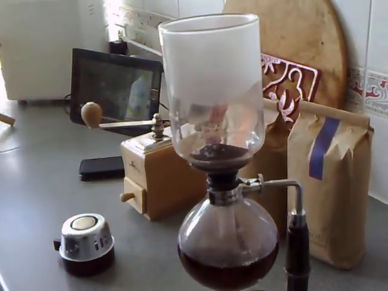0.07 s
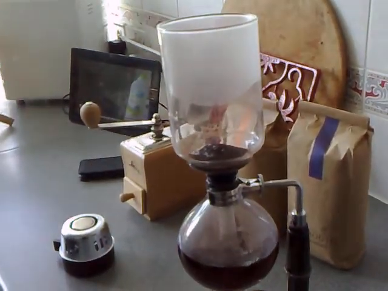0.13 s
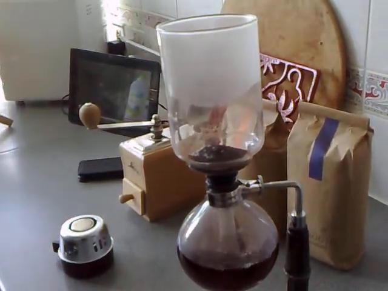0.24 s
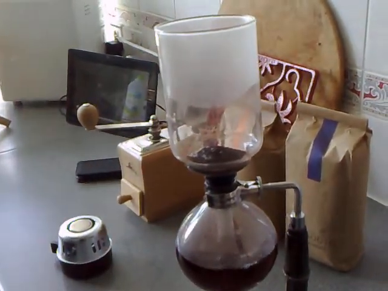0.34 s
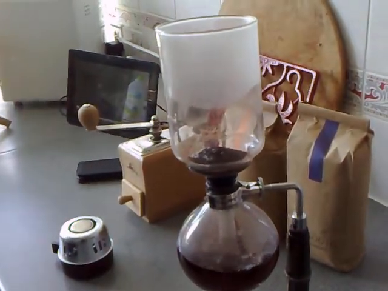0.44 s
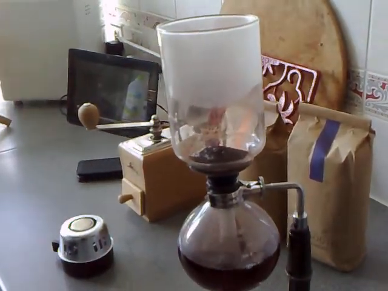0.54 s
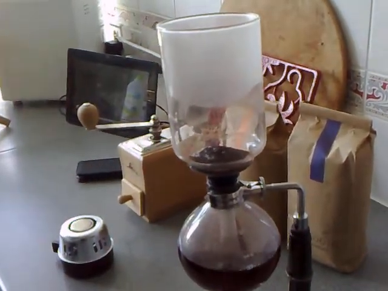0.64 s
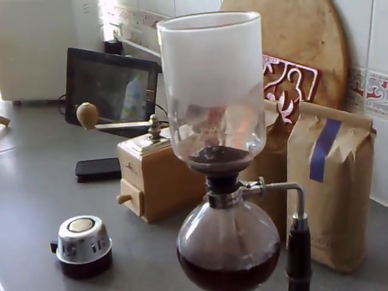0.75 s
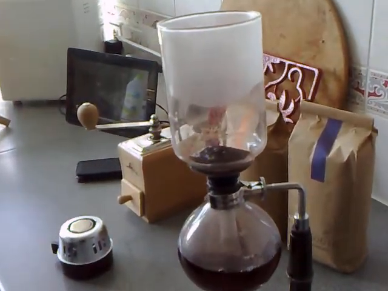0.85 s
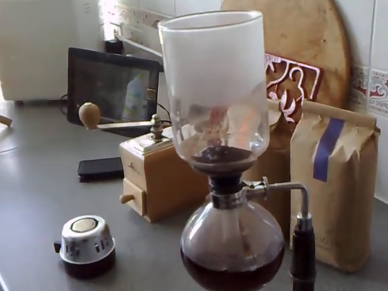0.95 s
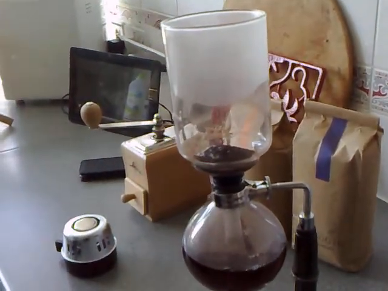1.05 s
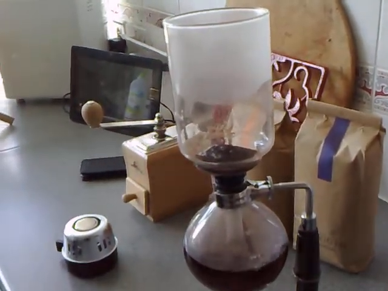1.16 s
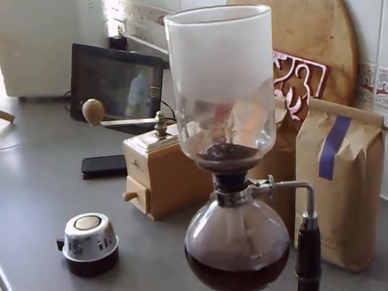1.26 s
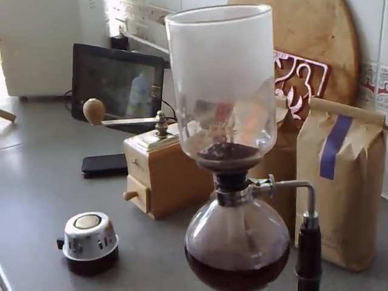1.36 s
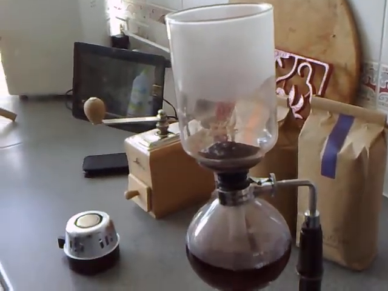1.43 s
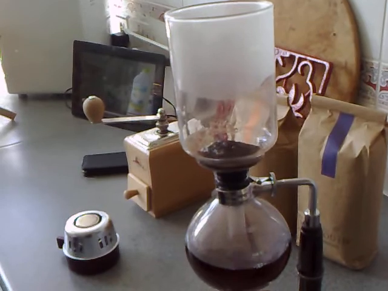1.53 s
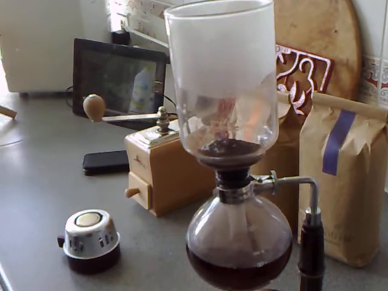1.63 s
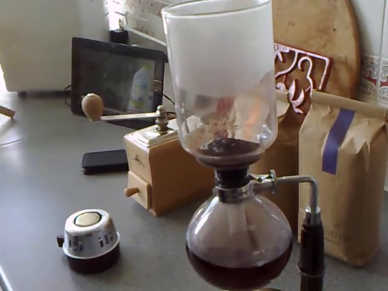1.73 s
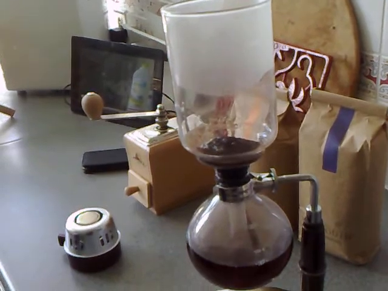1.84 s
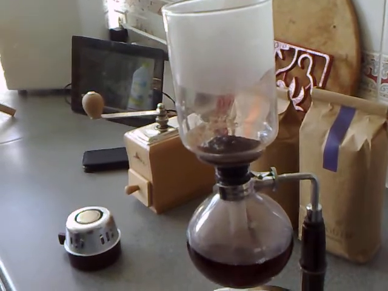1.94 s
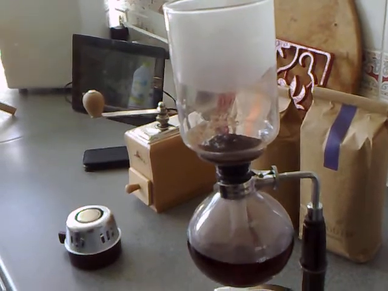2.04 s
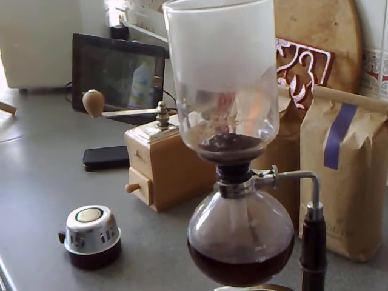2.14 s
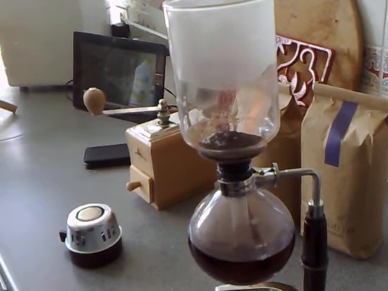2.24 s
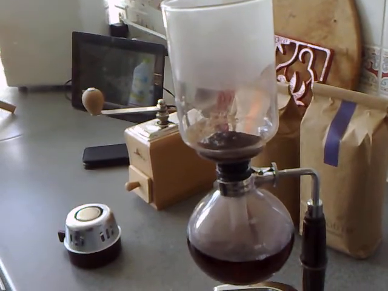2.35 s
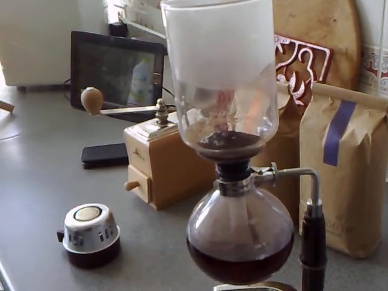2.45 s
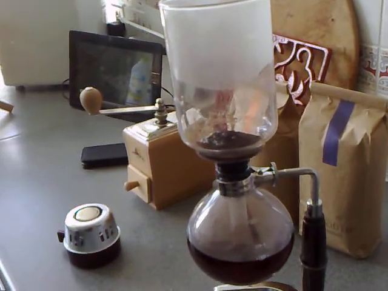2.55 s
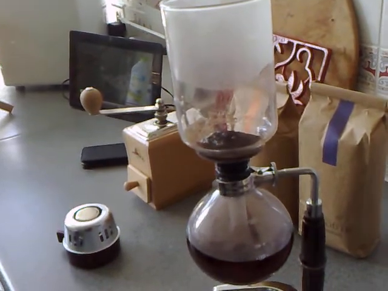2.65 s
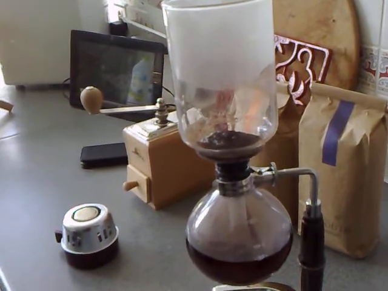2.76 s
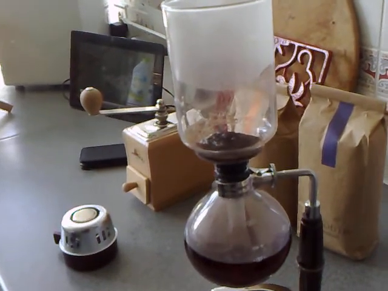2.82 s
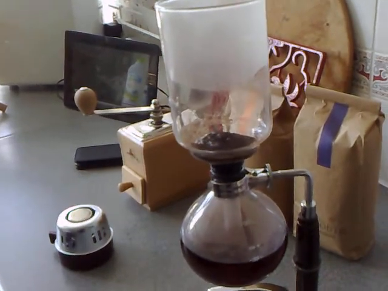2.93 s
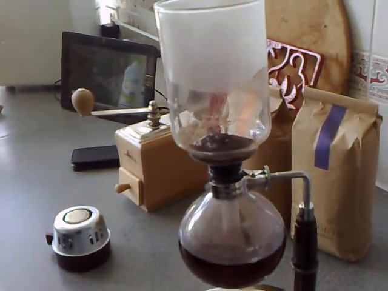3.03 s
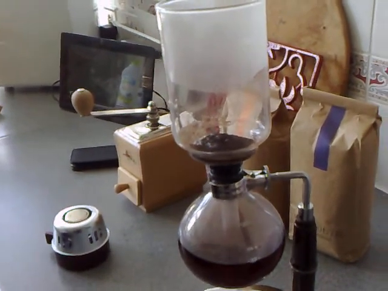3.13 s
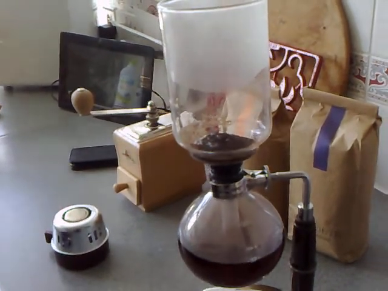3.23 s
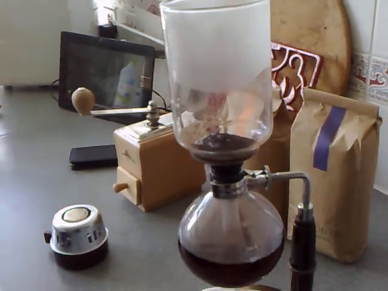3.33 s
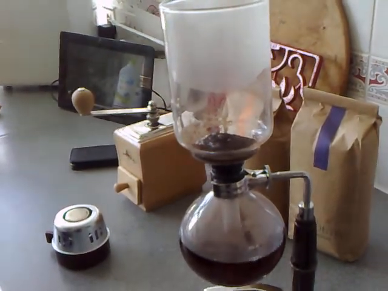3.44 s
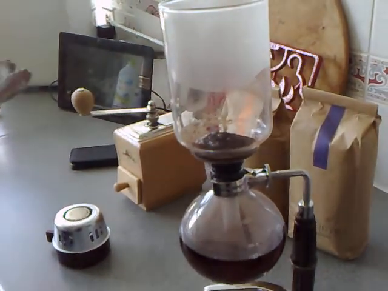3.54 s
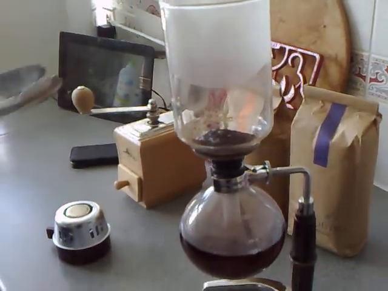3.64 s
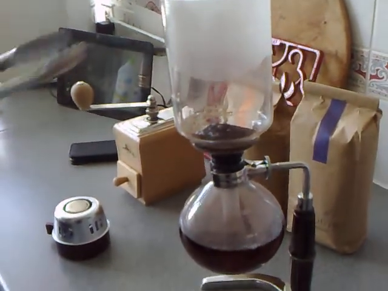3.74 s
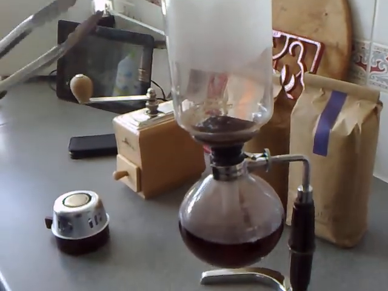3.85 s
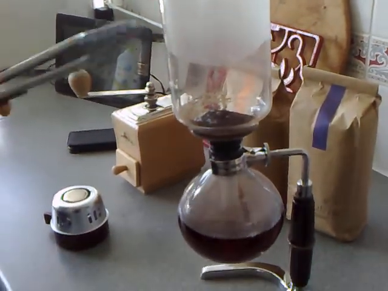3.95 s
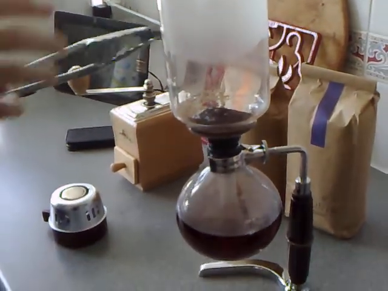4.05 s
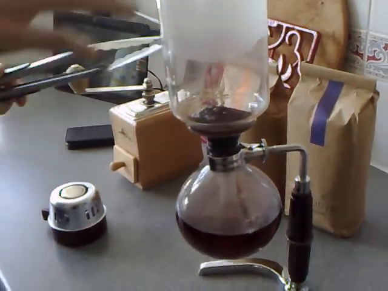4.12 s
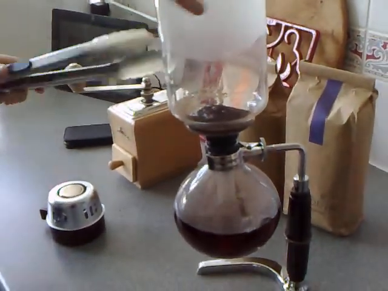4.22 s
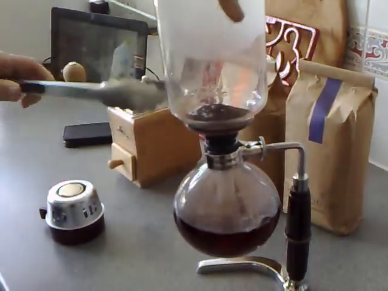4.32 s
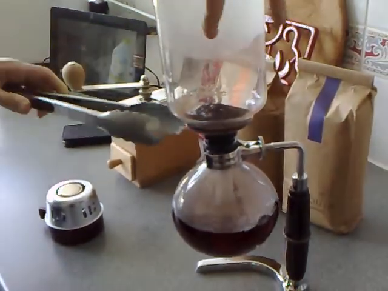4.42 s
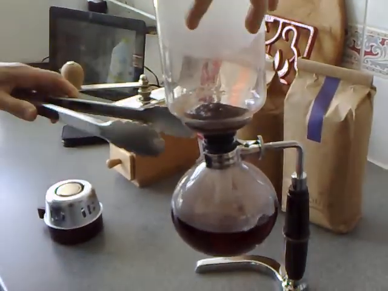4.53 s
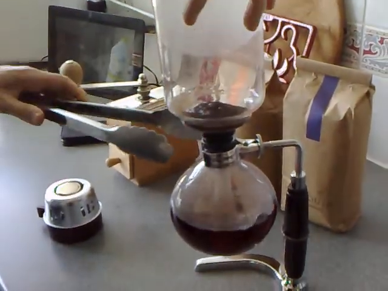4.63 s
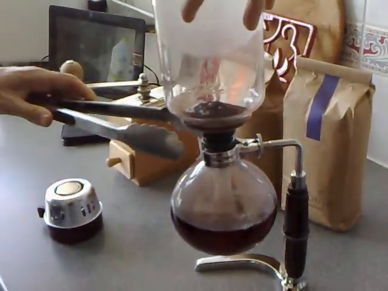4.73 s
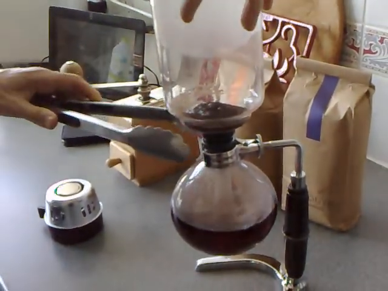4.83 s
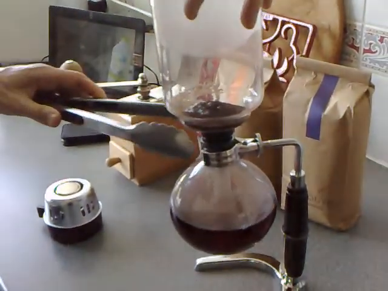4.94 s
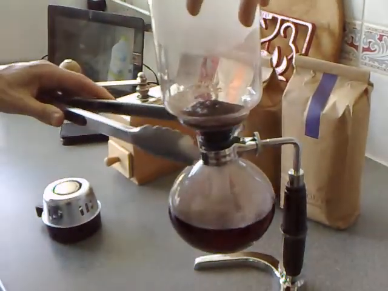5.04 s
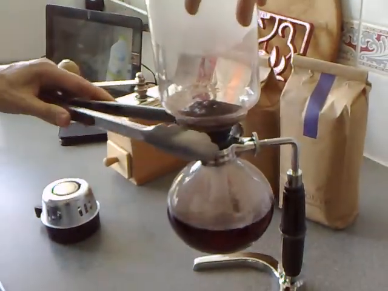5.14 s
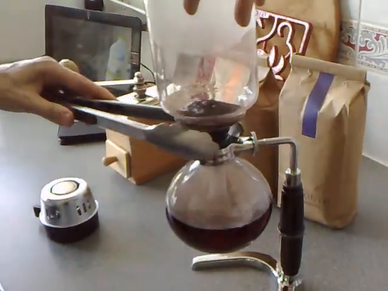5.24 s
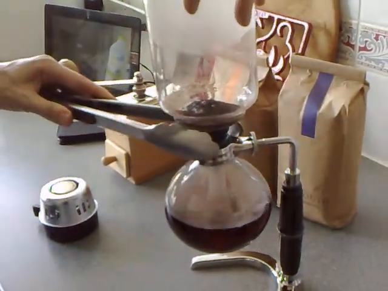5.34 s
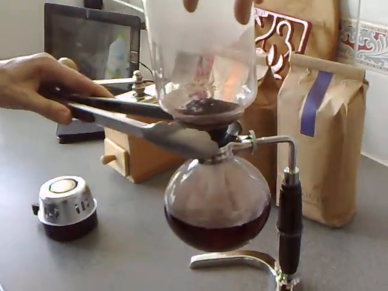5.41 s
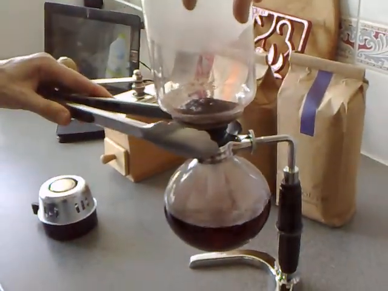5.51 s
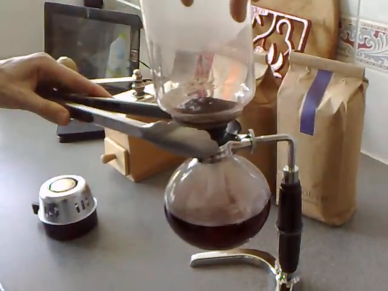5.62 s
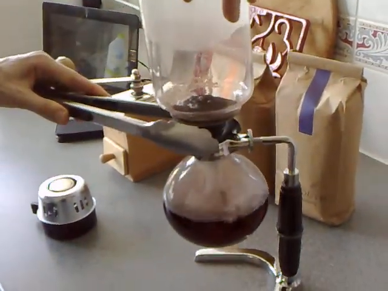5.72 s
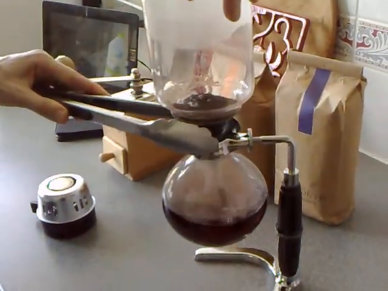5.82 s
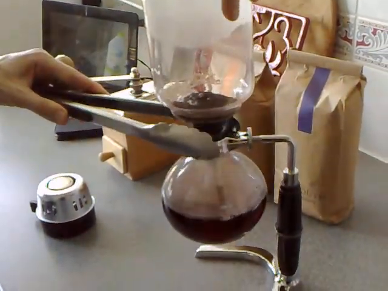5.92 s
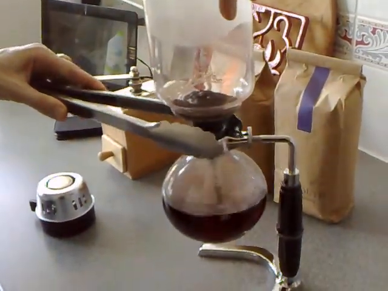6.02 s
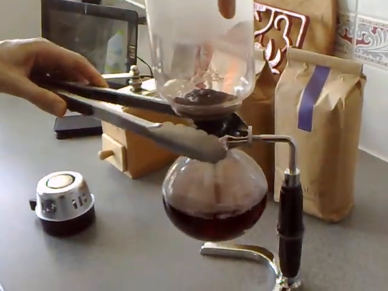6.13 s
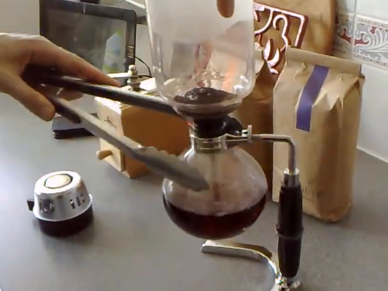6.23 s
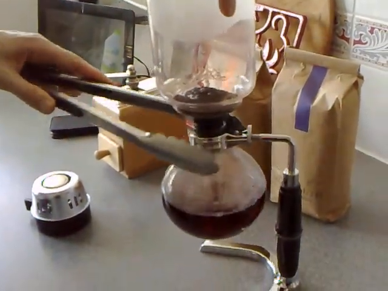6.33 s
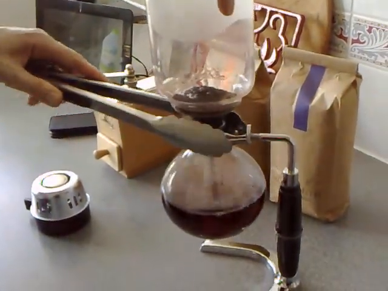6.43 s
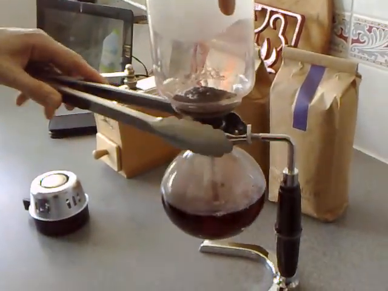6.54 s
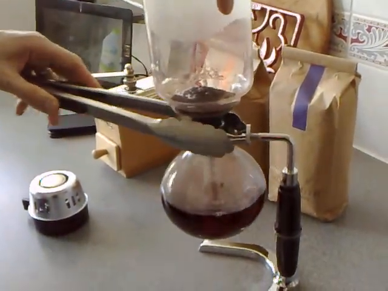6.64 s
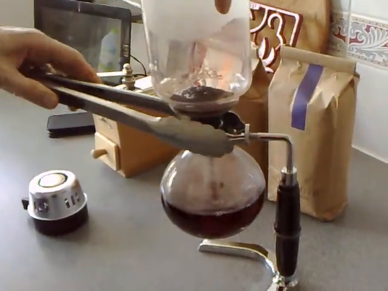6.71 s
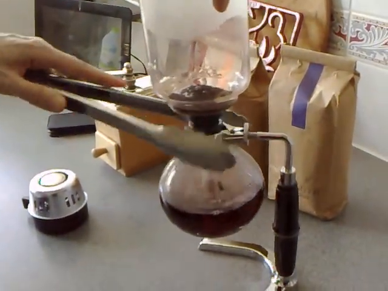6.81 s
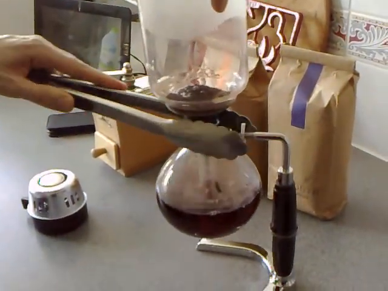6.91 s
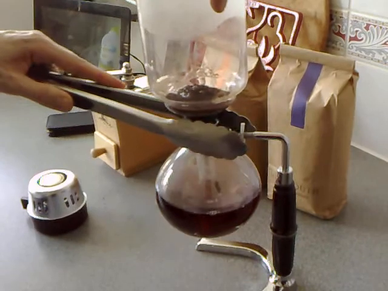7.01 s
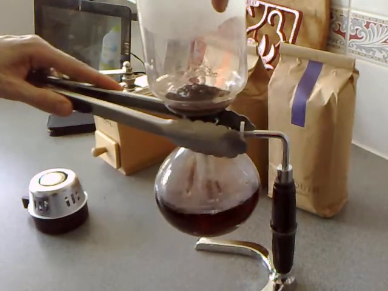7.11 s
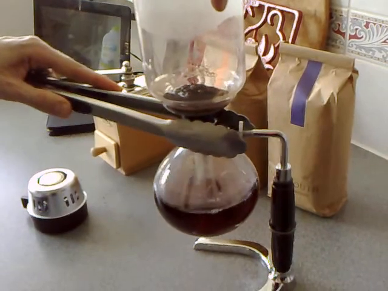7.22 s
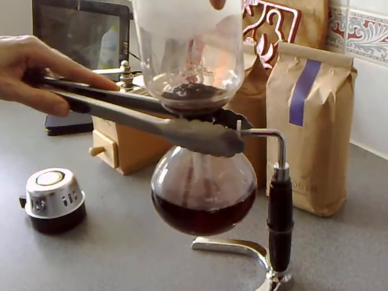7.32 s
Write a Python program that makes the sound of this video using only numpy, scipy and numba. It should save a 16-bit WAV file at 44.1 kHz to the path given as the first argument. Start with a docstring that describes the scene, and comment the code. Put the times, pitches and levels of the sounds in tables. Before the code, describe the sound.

A steady, soft room noise with faint hum and hiss runs throughout in a small, hard-surfaced kitchen. Tiny metal touches come at 0.1 and 0.2 seconds, then muffled utensil rattles from 0.9 to 1.4. At 1.6 steel tongs begin sliding off a rack in grainy, stick-slip pulls, swelling into a loud ringing screech with jolts around 1.9 to 2.1, then stopping suddenly. Metallic clicks follow at 2.6, a faint low thud at 2.7, a sharp double snap at 2.95 and another barely audible thud at 3.1. Faint ticks and a skin rustle pass between 3.5 and 3.9, then near quiet. At 5.3 bright, dry steel-on-glass clinks burst out with hollow knocks; a rubbery chafe comes at 5.9. More irregular clinks and knocks follow from 6.05 to 6.75, and a dense, hard cluster at 6.95 to 7.1. A faint clink ends it at 7.36. Background level dips after loud hits.

```python
"""Over a steady room noise with a faint hum and hiss, utensils are nudged on their rack in a small kitchen.
Steel tongs are pulled off the rack with a stick-slip scrape and a few jolts, snapped open between two faint
low thuds and slid through the hand. They clink on the neck and clamp of a glass vacuum coffee maker (overtone
bursts over damped modes) while its hand-rocked upper chamber knocks and chafes in its seat; a last faint clink
follows. Kitchen reflections surround the handling, and a gain control ducks after each loud sound."""
import sys
import numpy as np
from scipy import signal
from scipy.fft import rfft, irfft
from scipy.io import wavfile
from numba import njit

SR = 44100
rng = np.random.default_rng(int(sys.argv[2]) if len(sys.argv) > 2 else 0)


def wrap_up_sound(samples):
    """Save the sound to the file named by the first command line argument, as 16-bit audio."""
    columns = np.atleast_2d(samples).T
    # keep every value between -1 and 1, then stretch to whole-number steps
    tamed = np.clip(columns, -1, 1)
    steps = np.round(tamed * 32767).astype(np.int16)
    wavfile.write(sys.argv[1], SR, steps)


N = 325017
TIME = np.arange(N) / SR
RING = TIME[:SR // 2]  # time axis of one blow, half a second

# Room noise. Each row: frequency in Hz, level in dB.
ROOM_TONE = [(15, -38.5), (25, -2.5), (92, -1.5), (310, -2), (700, -9.5), (2050, -16.5), (5570, -26.5),
             (16000, -24)]
# Whirring bands in the room noise. Each row: centre in Hz, width at half amplitude in Hz, level in dB.
WHIR_BANDS = [(100, 15, -63.5), (245.4, 7, -63.5), (297.2, 8, -61), (2083, 180, -61)]
# Decay of the kitchen's reflections. Each row: frequency in Hz, t60 in seconds.
ROOM_T60 = [(200, 0.39), (2500, 0.25), (6000, 0.18), (14000, 0.12)]
# Tone of the reflections. Each row: frequency in Hz, level in dB.
ROOM_COLOUR = [(600, 3), (5500, 4), (10000, 6)]

# Utensils nudged on their rack and the worktop, and two faint low thuds, perhaps footsteps or a drawer.
# Each row: start in seconds, level in dB, t60 of the rattle's envelope in seconds, strongest ring in Hz.
NUDGES = [(.23, -45, 0.09, 300), (.901, -38.5, 0.15, 575), (.932, -39.5, 0.11, 2080),
          (1.112, -36, 0.1, 1500), (1.279, -35, 0.24, 1430), (1.312, -34, 0.26, 1500),
          (1.328, -37, 0.052, 524), (1.363, -36, .08, 1480), (2.678, -51, 0.08, 403),
          (3.097, -70, 0.21, 480)]
# Pulls that slide the tongs off the rack. Each row: start in seconds, swell in seconds, t60 of the easing force
# in seconds, friction in dB, rack ring in dB, mounting rumble in dB, screech in Hz, screech in dB.
PULLS = [(1.587, 0.067, 0.36, -32.5, -48, -45.5, 2000, -40),
         (1.732, 0.018, 0.12, -34, -39.5, -39.5, 2530, -38.5),
         (1.765, 0.026, 0.18, -30.5, -25, -46, 1280, -22),
         (1.812, 0.031, 0.49, -33.5, -31, -51.5, 1880, -34),
         (1.93, 0.011, 0.6, -15, -11, -41.5, 1400, -11.5),
         (2.013, 0.029, 0.13, -18, -10.5, -25, 2390, -6.5)]
# The tongs jolt against the rack as they slide. Each row: start in seconds, level in dB.
BUMPS = [(1.834, -25), (1.958, -14.5), (1.981, -19.5), (2.003, -16.5)]
# The tongs' arms, lock and spring, and a last faint clink.
# Each row: start in seconds, level in dB, t60 of the rattle's envelope in seconds, strongest ring in Hz.
SNAPS = [(.14, -41.5, 0.078, 1810), (2.588, -29.5, 0.14, 1570), (2.612, -21, 0.11, 2850),
         (2.949, -13.5, 0.055, 2280), (2.967, -15, 0.068, 1500), (3.523, -47, .012, 1180),
         (3.771, -41.5, .052, 5140), (3.794, -36.5, 0.026, 5040), (3.902, -43, 0.13, 4500),
         (7.361, -35.5, 0.2, 2560)]
# The tongs slide lightly through the hand. Each row: middle in seconds, level in dB, half length in seconds.
RUSTLES = [(3.64, -60.5, 0.091)]
# The rubber seal chafes as the chamber is rocked. Each row: middle in seconds, level in dB, half length in seconds.
CHAFES = [(5.883, -34, 0.039), (6.251, -37, 0.014), (6.283, -49.5, 0.45)]
# The chamber knocks in its seat.
# Each row: start in seconds, level in dB, t60 of the wobble's envelope in seconds, strongest ring in Hz.
KNOCKS = [(5.299, -20.5, 0.21, 902), (5.303, -23.5, 0.18, 240), (5.358, -22, 0.12, 477),
          (6.078, -29, 0.081, 780), (6.323, -23.5, 0.12, 478), (6.331, -22.5, 0.046, 486),
          (6.353, -24.5, 0.23, 434), (6.606, -22.5, 0.11, 294), (6.937, -36, 0.084, 225),
          (7.009, -27.5, 0.13, 217), (7.082, -16.5, 0.037, 866), (7.12, -27.5, 0.089, 720)]
# Tongs on the glass neck and clamp. Each row: start in seconds, level in dB, high ring in dB,
# t60 of the contact chatter's envelope in seconds, strongest ring in Hz.
CLINKS = [(5.2939, -16, -8.5, 0.053, 6100), (5.321, -2, -15.5, 0.04, 4620), (5.3563, -4, -5.5, 0.029, 2570),
          (6.053, -35.5, -22.5, 0.078, 2800), (6.0761, -13.5, -1, 0.022, 1610), (6.32, -29, -4, 0.1, 1700),
          (6.3491, -5.5, 3, 0.029, 2700), (6.474, -25, -1, 0.0047, 2630), (6.5614, -26, 0, 0.043, 2150),
          (6.5901, -2.5, -1, 0.018, 5100), (6.605, -9.5, -1.5, 0.0051, 4940),
          (6.7531, -12.5, -0.5, 0.027, 9500), (6.965, -11.5, 11.5, 0.02, 1640), (7.0135, -9, 0, 0.04, 1980),
          (7.078, -4, 1, 0.038, 2390), (7.083, 1, -3, 0.02, 1580), (7.088, -6, -1, 0.03, 7540)]

# Ringing modes of each object. Each row: frequency in Hz, level in dB, t60 in seconds.
UTENSIL_MODES = [(513, -6.5, 0.074), (1500, 3, 0.025)]
RACK_MODES = [(1163, -10, .08), (1400, 0, .07), (1443, 0, .09), (1507, 2, .09), (1637, -11, .09),
              (1760, -8, .09), (1986, -5, .1), (2175, -11, .08), (2579, -11, .14)]
BLADE_MODES = [(2326, -3, .05), (5150, -6, 0.06), (7307, -11, .07), (8370, -9, .05), (9090, -6, .05),
               (9700, -2, .06), (10370, -7, .07), (11230, -7, .06), (12660, -7, .04), (14770, -8, .06)]
SPRING_MODES = [(1474, -6, .08), (2350, 0, 0.038), (2716, -6, 0.068), (3820, 1, 0.097), (5136, -2, 0.065),
                (5720, -2.5, 0.06), (6220, 3, 0.05)]
CHAMBER_MODES = [(199, -9.5, 0.089), (312, -1.5, .058), (486, -5, 0.045), (708, 0.5, 0.036),
                 (854, -7.5, 0.048), (1113, -10, .069)]
CLAMP_MODES = [(4750, -3, 0.069), (6100, -1.5, 0.044), (8550, -6.5, 0.061)]
TONG_MODES = [(1800, 1, 0.024), (2397, 1.5, 0.015), (2560, 8.5, 0.018), (4550, -4.5, 0.03),
              (5315, 2, 0.042), (9670, 8.5, 0.017), (11050, -2.5, 0.022)]

# Dense overtones of each object or rub. Each row: frequency in Hz, level in dB.
UTENSIL_COLOUR = [(100, -29), (350, -5.5), (550, 6), (800, -4), (1500, -1.5), (2600, -5), (4000, -17),
                  (12000, -36)]
BLADE_COLOUR = [(100, -42.5), (300, -8.5), (750, -11), (1150, 3), (2550, -4), (3500, -11), (5300, -4.5),
                (6300, -12), (9800, -11.5), (16000, -20.5)]
RUMBLE_COLOUR = [(50, -40.5), (90, 4), (140, -5), (220, -17), (410, 0.5), (660, -16.5), (2000, -38)]
SPRING_COLOUR = [(40, -16), (200, -21.5), (800, -17.5), (1300, -11), (2300, -1.5), (2850, -6),
                 (3300, -10.5), (5900, -3.5), (6700, -13), (11000, -18.5), (16000, -26)]
RUSTLE_COLOUR = [(1000, -5), (5200, -1), (8000, -15)]
CHAMBER_COLOUR = [(80, -12.5), (210, -2.5), (370, 0.5), (490, 5), (900, -2), (2600, -11), (4000, -27.5),
                  (12000, -63)]
TONG_COLOUR = [(100, -52), (900, -5.5), (1650, -2.5), (2450, 4), (3500, -9), (5100, -1.5), (7200, -6.5),
               (9700, -9), (12000, -16), (16000, -20.5)]
# How the chamber answers at the neck, where the seal rubs. Each row: frequency in Hz, level in dB.
NECK_COLOUR = [(180, 0), (290, 7), (530, -8.5), (850, 1.5), (2400, -8)]

# How force and rattle tilt the spectrum of a blow; a negative loss brightens. Each row: level of a fully hard
# contact in dB, its tilt in dB per octave, tilt lost per dB below that level, tilt lost per second of rattle.
NUDGE_HARDNESS = (-31, 0.75, 0.6931, -2)
SNAP_HARDNESS = (-33, 3, 1.0755, 21.5)
KNOCK_HARDNESS = (-13.5, 0.5, 0.1871, -1.5)


def undb(db):
    """Decibels to gain."""
    return 10 ** (np.asarray(db) / 20)


def unit(x):
    """Scale to rms 1."""
    return x / np.sqrt(np.mean(x ** 2))


def along(points, hz):
    """Read (Hz, value) points on a log-frequency axis."""
    f, value = np.transpose(points)
    return np.interp(np.log(hz + 1e-9), np.log(f), value)


def bins(size):
    """Frequencies of a spectrum of this many samples, kept at 1 Hz or above."""
    return np.maximum(np.fft.rfftfreq(size, 1 / SR), 1)


def colour(x, points):
    """Shape a signal with a (Hz, dB) spectrum."""
    return irfft(rfft(x) * undb(along(points, bins(len(x)))), len(x))


def equalise(x, db):
    """Causal minimum-phase filter with a gain in dB for each frequency bin."""
    cepstrum = irfft(np.log(undb(db)), len(x))
    cepstrum[1:] *= 2 * (np.arange(1, len(x)) < len(x) / 2)
    return irfft(rfft(x) * np.exp(rfft(cepstrum)), len(x))


def convolve(x, response):
    """Pass a signal through a response, keeping its length."""
    return signal.fftconvolve(x, response)[:len(x)]


def add(track, s, x):
    """Mix a sound in at time s."""
    i = int(s * SR)
    track[i:i + len(x)] += x[:N - i]


def fade(t60):
    """Exponential decay."""
    return np.exp(-np.log(1000) * RING / max(t60, 1e-3))


def judder(rate_hz, depth_db):
    """Gain that wanders at random between knots."""
    knots = np.arange(0, TIME[-1] + 1, 1 / rate_hz)
    return undb(depth_db * np.interp(TIME, knots, rng.standard_normal(N)[:len(knots)]))


def swells(events):
    """Level of soft rubs that rise and fall."""
    return sum(undb(db) * np.exp(-((TIME - s) / half_s) ** 2) for s, db, half_s in events)


def slips(rate, spread_db):
    """Stick-slip friction: random clicks of uneven size, this many per second on average."""
    hits = rng.random(N) < rate / SR
    size = undb(spread_db * rng.standard_normal(N))
    return hits * size * rng.choice([-1, 1], N)


def chatter(envelope, count=3):
    """A burst of tiny recontacts that holds every frequency about equally."""
    x = rng.standard_normal(len(RING)) * envelope
    for _ in range(count):
        # flatten the spectrum, then gather the burst in time again
        flat = irfft(np.exp(1j * np.angle(rfft(x))), len(RING))
        x = flat * envelope ** (1 / 4)
    return x


def ring(modes, scatter_db=0, detune=0):
    """Damped modes; each contact point and grip shares out the energy and bends the pitches differently."""
    out = 0
    chance = rng.standard_normal((len(modes), 3))
    for (hz, db, t60), (level, bend, polarity) in zip(modes, chance):
        tone = np.sin(2 * np.pi * hz * (1 + detune * bend) * RING)
        out = out + np.sign(polarity) * undb(db + scatter_db * level) * fade(t60) * tone
    return out


def blow(modes, overtones, chatter_s, modes_db, contact_t60=0.0053, size=256):
    """One contact: a burst of dense overtones while the parts chatter, and the modes that ring on."""
    push = 1 - fade(contact_t60)  # the contact presses in gradually
    crack = equalise(chatter(push * fade(chatter_s)), along(overtones, bins(len(RING))))
    tone = ring(modes, scatter_db=2.5, detune=.007) * push
    # balance and scale by the first few milliseconds
    y = crack / np.std(crack[:size]) + undb(modes_db) * tone / np.std(tone[:size])
    return y / np.std(y[:size])


def favour(hz, boost_db, octaves, floor):
    """Equaliser bump in dB where a contact point favours one ring, with the rest lowered."""
    distance = np.log2(bins(len(RING)) / hz) / octaves
    return boost_db * (np.exp(-distance ** 2) - floor)


def strikes(events, modes, overtones, hardness, modes_db, centre_hz, boost_db, boost_octaves, contact_t60=0.0009):
    """Blows with one set of modes; force and rattle tilt the spectrum, the contact point favours one ring."""
    out = np.zeros(N)
    octaves = np.clip(np.log2(bins(len(RING)) / centre_hz), -2, 2)
    hard_db, hard_tilt, weak_loss, glancing_loss = hardness
    for s, db, chatter_s, ring_hz in events:
        tilt = hard_tilt - weak_loss * max(hard_db - db, 0) - glancing_loss * chatter_s
        favoured = favour(ring_hz, boost_db, boost_octaves, floor=.5)
        y = blow(modes, overtones, chatter_s, modes_db, contact_t60)
        add(out, s, undb(db) * equalise(y, tilt * octaves + favoured))
    return out


def room_noise(noise_db=-52.5):
    """Even background noise with a few narrow whirring bands that waver."""
    out = undb(noise_db) * unit(colour(rng.standard_normal(N), ROOM_TONE))
    for hz, width, db in WHIR_BANDS:
        band = 1 / (1 + ((bins(N) - hz) / width * 2) ** 2)
        whir = irfft(rfft(rng.standard_normal(N)) * band, N)
        out = out + undb(db) * unit(whir * judder(rate_hz=5.8, depth_db=3.5))
    return out


def hum(hum_hz=686.0, hum_db=-64):
    """A faint appliance hum: one sine, almost steady in level."""
    return undb(hum_db) * unit(np.sin(2 * np.pi * hum_hz * TIME) * judder(rate_hz=11, depth_db=0.5))


def kitchen(first_s=0.0055, build_s=0.00038):
    """Reflections from worktop and tiles build up to a short noise tail that dulls as it dies."""
    f = bins(len(RING))
    noise = rfft(rng.standard_normal(len(RING))) * undb(along(ROOM_COLOUR, f))
    tail = 0
    for k, (hz, t60) in enumerate(ROOM_T60):
        # crossfaded bands, each with its own decay
        share = along([(row[0], j == k) for j, row in enumerate(ROOM_T60)], f)
        tail = tail + irfft(noise * share, len(RING)) * fade(t60)
    return tail / np.linalg.norm(tail) * np.clip((RING - first_s) / build_s, 0, 1)


def reverberate(x, size=SR // 4):
    """Reflections whose pattern changes every quarter second, in crossfaded pieces, as the hands keep moving."""
    out, window = np.zeros(N), signal.windows.cosine(2 * size)
    for i in range(0, N - size, size):
        piece = x[i:i + 2 * size]
        add(out, i / SR, signal.fftconvolve(piece * window[:len(piece)], kitchen()))
    return out


def nudges_and_thuds():
    """Nudged utensils and two faint low thuds: soft, slow contacts that excite few modes."""
    return strikes(NUDGES, UTENSIL_MODES, UTENSIL_COLOUR, NUDGE_HARDNESS, modes_db=-0.5, centre_hz=1010,
                   boost_db=6.0, boost_octaves=.25, contact_t60=0.015)


def rustle():
    """Skin slides over steel with a faint, grainy hiss of small slips."""
    return unit(colour(slips(rate=670, spread_db=1), RUSTLE_COLOUR)) * swells(RUSTLES)


def pull(s, swell_s, ease_t60, catch_db=-5, free_s=2.096, let_go_s=0.033):
    """Force of one pull: the steel catches, is pressed harder, then eases until the tongs come free."""
    age = TIME - s
    # catch_db holds the swell back at first; the square root starts it from nothing
    swell = undb(catch_db * np.clip(1 - age / swell_s, 0, 1)) * np.sqrt(np.clip(age / swell_s, 0, 1))
    ease = np.exp(-np.log(1000) * np.maximum(age - swell_s, 0) / ease_t60)
    let_go = np.clip(1 - (TIME - free_s) / let_go_s, 0, 1)
    return swell * ease * let_go


def drag(rack_power=1.3, rumble_power=0.24, screech_q=9.3):
    """Steel slides on steel: slips ring the blades and rack and shake its mounting; each pull has its screech."""
    grip = unit(slips(rate=1200, spread_db=2.5) * judder(rate_hz=90, depth_db=2.6))
    friction, rack, rumble, screech = np.zeros((4, N))
    for s, swell_s, ease_t60, friction_db, rack_db, rumble_db, screech_hz, screech_db in PULLS:
        force = pull(s, swell_s, ease_t60)
        friction += undb(friction_db) * force
        # the rack's ring grows faster than the force, the mounting's rumble more slowly
        rack += undb(rack_db) * force ** rack_power
        rumble = np.maximum(rumble, undb(rumble_db) * force ** rumble_power)
        # the point of contact picks out a narrow band
        band = signal.lfilter(*signal.iirpeak(screech_hz, screech_q, fs=SR), grip)
        screech += undb(screech_db) * force ** 2 * unit(band)
    blades, bars = (r / np.linalg.norm(r) for r in (ring(BLADE_MODES), ring(RACK_MODES)))
    rasp = unit(colour(grip, BLADE_COLOUR)) * friction
    # the blades only sing out when they are pressed hard
    pressure = np.sqrt(friction / friction.max())
    blade_song = undb(-1.0) * convolve(grip * friction * pressure, blades)
    rack_song = convolve(grip * rack, bars)
    mounting = unit(colour(grip, RUMBLE_COLOUR)) * rumble
    return rasp + screech + blade_song + rack_song + mounting


def bumps():
    """The sliding tongs jolt against the bars of the rack, which ring under the blades' overtones."""
    out = np.zeros(N)
    for s, db in BUMPS:
        add(out, s, undb(db) * blow(RACK_MODES, BLADE_COLOUR, chatter_s=0.036, modes_db=4.0))
    return out


def snaps_and_last_clink():
    """Arms, lock and spring of the tongs, and a last faint clink; weak or long rattles are duller."""
    return strikes(SNAPS, SPRING_MODES, SPRING_COLOUR, SNAP_HARDNESS, modes_db=-9.5, centre_hz=2800,
                   boost_db=9.5, boost_octaves=0.16)


def chafe():
    """The seal creeps in small slips that swell and sound the hollow chamber."""
    grip = colour(slips(rate=1200, spread_db=3.0), NECK_COLOUR)
    body = unit(colour(grip, CHAMBER_COLOUR)) + undb(-1.5) * unit(convolve(grip, ring(CHAMBER_MODES)))
    return unit(body) * swells(CHAFES)


def chamber(low_cut_hz=110):
    """The glass chamber knocks in its seat and chafes; it is too small to radiate deep bass."""
    knocks = strikes(KNOCKS, CHAMBER_MODES, CHAMBER_COLOUR, KNOCK_HARDNESS, modes_db=1.5, centre_hz=450,
                     boost_db=10.0, boost_octaves=0.25)
    low_cut = signal.butter(2, low_cut_hz, "high", fs=SR, output="sos")
    return signal.sosfilt(low_cut, knocks + chafe())


def clinks(low_ring_db=-8, low_ring_fall=0.38, jaw_ring_db=-1.5, jaw_damping=66, clamp_db=-23.5, clamp_fall=0.86):
    """Steel jaws on glass: force sets how much the low ring speaks; the place of contact may sound the clamp."""
    out, f = np.zeros(N), bins(len(RING))
    for s, db, high_db, chatter_s, ring_hz in CLINKS:
        # a light touch sounds the jaws' low ring, a hard one skips it (fall in dB per dB of level)
        low_db = low_ring_db - low_ring_fall * db
        contact = [(2600, low_db), (4200, 0.39), (7000, -3.7), (9600, high_db), (13500, min(high_db, 0))]
        favoured = favour(ring_hz, boost_db=7.0, octaves=0.13, floor=.25)
        # jaws that stay in contact ring less (damping in dB per second of chatter)
        jaws = blow(TONG_MODES, TONG_COLOUR, chatter_s, modes_db=jaw_ring_db - jaw_damping * chatter_s)
        jaws = equalise(jaws, along(contact, f) + favoured)
        # contacts that miss the high ring land on the clamp (fall in dB per dB of high ring)
        clamp = undb(clamp_db - clamp_fall * high_db) * ring(CLAMP_MODES, scatter_db=5.5)
        add(out, s, undb(db) * (jaws + clamp))
    return out


def scene():
    """Mix the sources, each with its own direct level and its own share of kitchen reflections."""
    nudges = nudges_and_thuds()
    scrape = drag() + bumps() + rustle()
    snaps = snaps_and_last_clink()
    knocks = chamber()
    steel = clinks()
    direct = steel + undb(4.5) * knocks + snaps + undb(-2.5) * nudges + scrape
    reflected = undb(-4.0) * steel + undb(4.5) * knocks + undb(-0.5) * snaps
    reflected = reflected + undb(-6) * nudges + undb(-2.5) * scrape
    return (direct + reverberate(reflected) + room_noise() + hum())[None]


@njit
def follow(x, attack, release):
    """Envelope that rises fast and falls slowly."""
    out, e = np.empty(len(x)), 0.
    for i in range(len(x)):
        e += (x[i] - e) * (attack if x[i] > e else release)
        out[i] = e
    return out


def record(dry, threshold_db=-17, attack_s=0.0044, release_s=0.8, slope=0.37, ceiling=0.53, top_hz=15900):
    """Gain control ducks after loud sounds, the sharpest peaks are rounded and the top is cut."""
    envelope = follow(np.abs(dry[0]), 1 / (attack_s * SR), 1 / (release_s * SR))
    gain = np.minimum(1, undb(threshold_db) / (envelope + 1e-9)) ** slope
    rounded = ceiling * np.tanh(dry * gain / ceiling)
    return signal.sosfilt(signal.ellip(10, .2, 70, top_hz, fs=SR, output="sos"), rounded)


dry = scene()
out = record(dry)
wrap_up_sound(out)
```